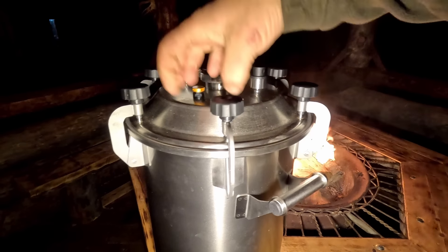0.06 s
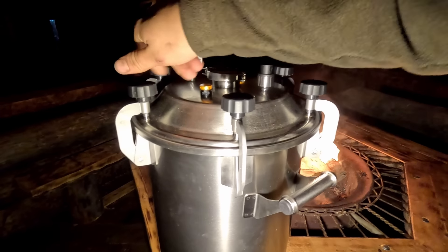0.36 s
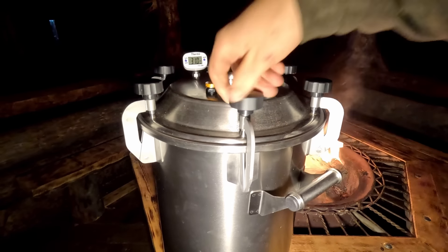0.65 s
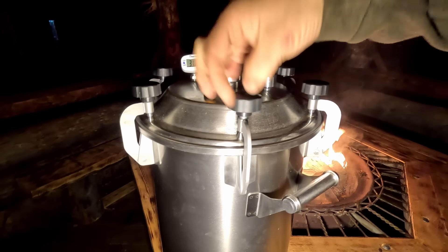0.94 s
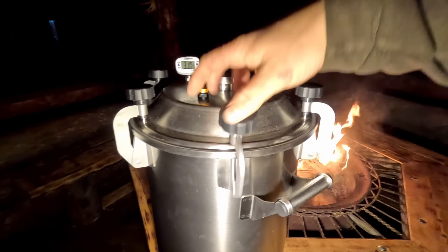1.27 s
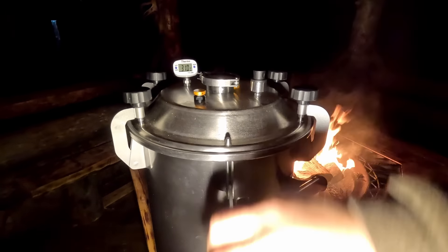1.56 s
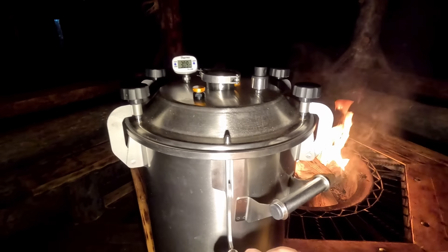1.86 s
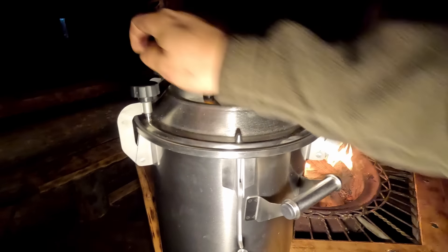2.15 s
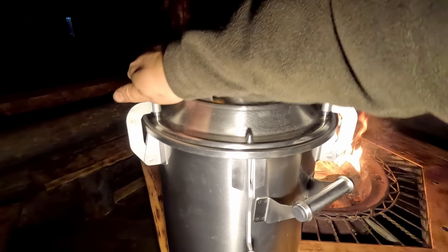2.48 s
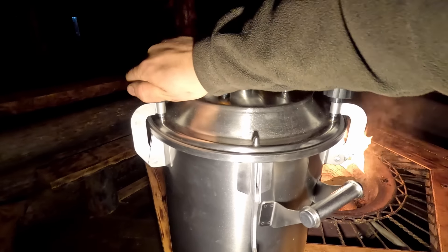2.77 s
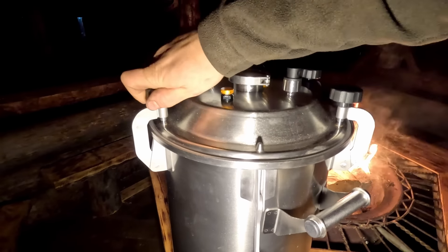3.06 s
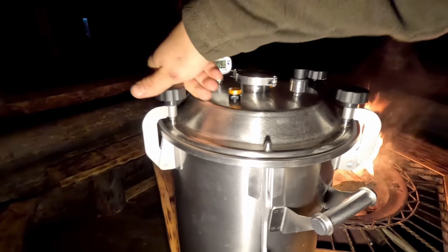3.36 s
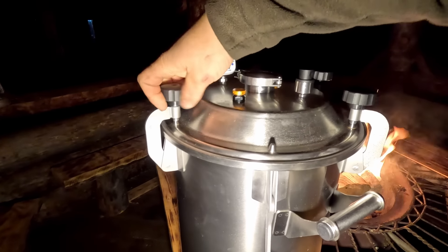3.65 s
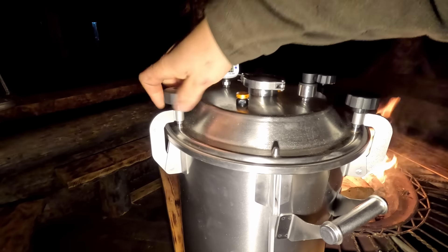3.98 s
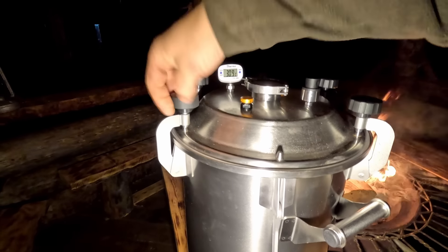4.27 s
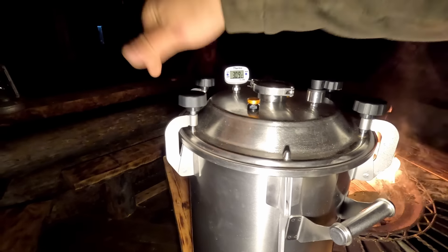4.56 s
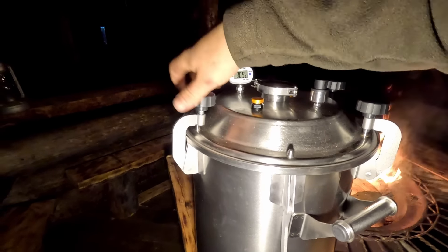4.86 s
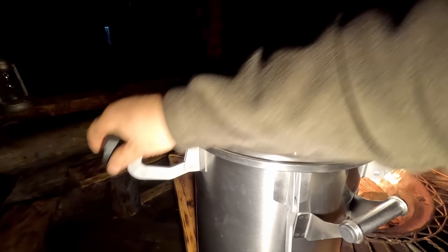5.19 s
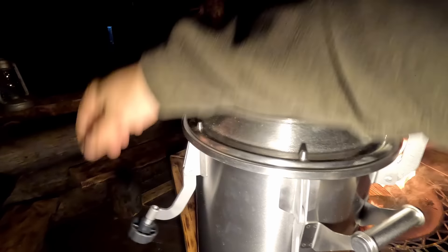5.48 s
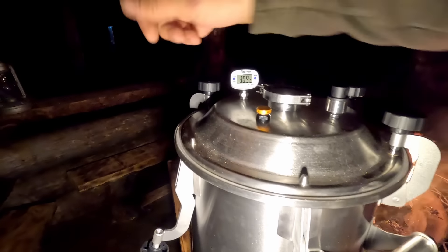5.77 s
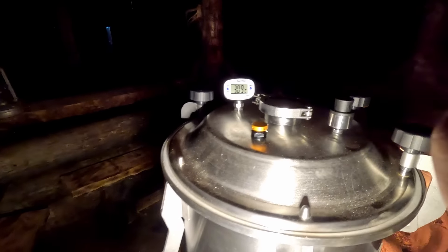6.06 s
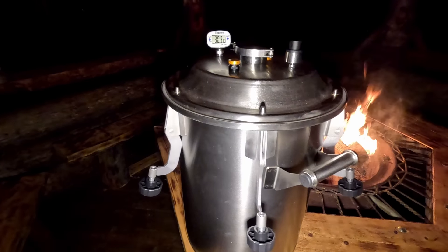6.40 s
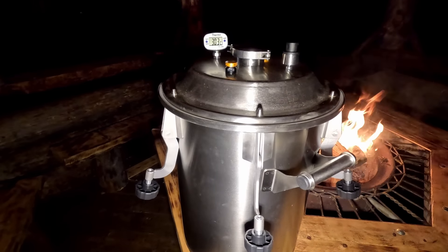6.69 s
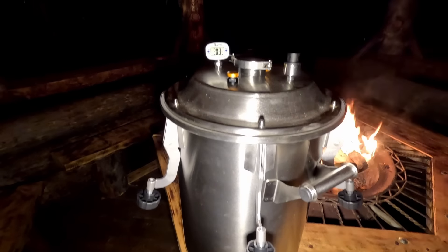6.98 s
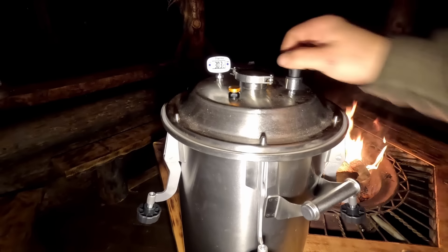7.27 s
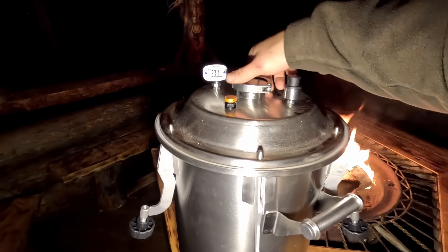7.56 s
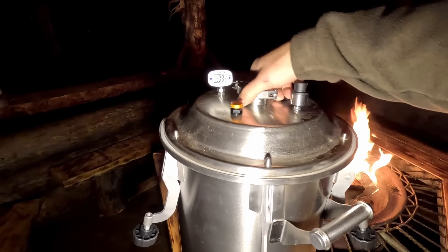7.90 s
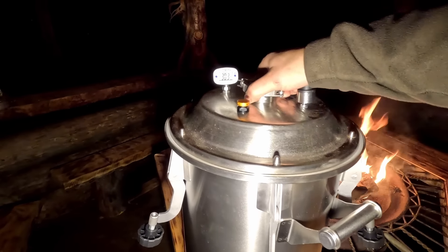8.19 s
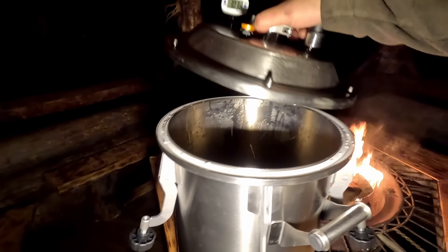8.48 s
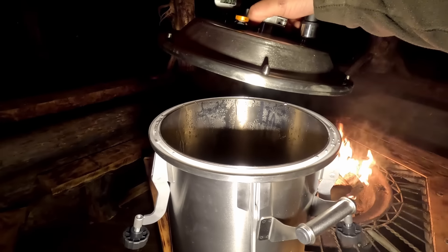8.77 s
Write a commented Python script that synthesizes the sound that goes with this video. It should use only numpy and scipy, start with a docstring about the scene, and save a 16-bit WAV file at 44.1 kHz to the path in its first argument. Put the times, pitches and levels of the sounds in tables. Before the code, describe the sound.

Metal clamps on a steel pressure pot are loosened by hand, clicking, rattling and swinging down on grinding hinges so that the pot rings. Fingers rub and a screw thread scrapes between two runs of clanks. After a lull, a tiny hiss precedes a hollow boom as the lid lifts and chatters on the rim. A wood fire flutters softly throughout, outdoors, with the microphone close.

```python
"""Under a timber shelter at night: a steel pressure canner beside a fluttering, crackling wood fire.
A hand unscrews the clamps; they rattle, swing down on grinding hinges and knock the pot into ringing.
The gasket hisses, then the lid comes free with a hollow boom and a low gust, and chatters on the rim.
Blows are decaying modes and noise, friction is trains of slips. Loud blows overload the microphone."""
import sys
import numpy as np
from scipy import signal
from scipy.fft import rfft, irfft
from scipy.io import wavfile

SR = 44100
rng = np.random.default_rng(int(sys.argv[2]) if len(sys.argv) > 2 else 0)


def transcribe(u):
    """Save the signal u as a 16-bit wav file named by the first command-line argument.

    u: samples, shape (n,) or (channels, n), limited to [-1, 1]; the rate is SR.
    q: integer samples, one column per channel.
    """
    v = np.clip(np.atleast_2d(u).T, -1, 1)
    q = np.round(v * 32767).astype(np.int16)
    wavfile.write(sys.argv[1], SR, q)


N = 394254
RING = 32768  # samples per blow
T, TIME = np.arange(RING) / SR, np.arange(N) / SR

# strongest modes of pot and front clamp: f/Hz, level/dB, t60/s
POT_MODES = [(162.7, -28, 0.78), (333, -22, 0.15), (365.6, -22.5, 1), (457.4, -24.5, 0.39),
             (622, -29.5, 0.33), (1047, -19.5, 0.25), (1150, -22, .22), (1372, -15.5, 0.15),
             (2166, -19.5, 0.18), (3130, -25, 0.13), (3430, -17.5, 0.23), (4210, -22.5, .13)]
FRONT_CLAMP_MODES = [(353, -16.5, 0.57), (521, -25, 0.55), (604, -24, 0.51), (674, -24, 0.52),
                     (755, -25, 0.51), (1507, -16.5, 0.15), (1990, -13.5, 0.098), (3130, -8, 0.079),
                     (3800, -32.5, 0.09), (4050, -20, 0.18), (5900, -21.5, 0.2), (6800, -25, 0.22)]
# spectrum of the pot's crowd of weak modes: f/Hz, level/dB
POT_SPECTRUM = [(70, -35.5), (115, -23), (155, -17.5), (255, -11), (350, -6.5), (470, -7), (820, -8),
                (1380, -1), (1720, -6), (3200, -2.5), (6000, -8.5), (8200, -20.5), (9600, -21.5),
                (15500, -58.5)]


def gain_of(db):
    """Decibels to amplitude."""
    return 10 ** (np.asarray(db) / 20)


def unit_rms(x):
    """Scales to rms 1."""
    return x / np.sqrt(np.mean(x ** 2) + 1e-20)


def value_at(points, hz):
    """Interpolates (f/Hz, value) points over log frequency."""
    f, value = np.transpose(points)
    return np.interp(np.log(hz + 1), np.log(f + 1), value)


def coloured(x, spectrum):
    """Filters x by (f/Hz, level/dB) points; rms 1."""
    hz = np.fft.rfftfreq(x.shape[-1], 1 / SR)
    return unit_rms(irfft(rfft(x) * gain_of(value_at(spectrum, hz)), x.shape[-1]))


def envelope(t_s, db):
    """Gain curve, silent outside its span."""
    return gain_of(np.interp(TIME, t_s, db, left=-120, right=-120))


def decay(t60_s):
    """Exponential decay."""
    return gain_of(-60 * T / t60_s)


def add(mix, t_s, sound):
    """Mixes a sound in at t_s."""
    part = mix[:, max(round(t_s * SR), 0):][:, :sound.shape[-1]]
    part += sound[..., :part.shape[1]]


def noise(size, spread):
    """Stereo noise: a shared part plus a smaller opposed part."""
    mid, side = rng.standard_normal((2, size))
    return np.array([mid + spread * side, mid - spread * side])


def slips(per_s, uneven_db, t60_s):
    """Random train of tiny impulses, each with a short noisy ring."""
    sizes = gain_of(uneven_db * np.minimum(rng.exponential(1, N), 4)) * rng.choice([-1, 1], N)
    train = sizes * (rng.random(N) < per_s / SR)
    ring = noise(RING, spread=0.15) * decay(t60_s)
    return signal.oaconvolve(train[None], ring, axes=1)[:, :N]


def hand_motion(moves):
    """Gain curve with one bell-shaped swell per move."""
    return sum(gain_of(db) * np.exp(-2 * ((TIME - t_s) / width_s) ** 2) for t_s, width_s, db in moves)


def fire(flutter_db=-36, roar_db=-38.5, lick_db=2, hiss_db=-48, spark_db=-9):
    """Flames flutter, roar in uneven licks and hiss; a few sparks snap."""
    # flame spectra: f/Hz, level/dB
    flutter = [(5, -6), (15, -5), (35, 2.5), (50, -7.5), (70, -8), (105, -34.5), (200, -61)]
    roar = [(70, -51), (112, -36), (138, 4), (170, -5), (210, 3.5), (255, -11), (310, -9.5), (365, -16.5),
            (440, -27.5), (540, -35), (700, -39), (1500, -64)]
    hiss = [(300, 11.5), (850, -6.5), (1200, 6), (2200, -0.5), (4400, -7), (7000, -8.5), (9800, -17),
            (12500, -33.5), (15500, -57)]
    # sparks: t/s, level/dB re spark_db
    sparks = [(0.5698, -27.5), (6.0836, -29), (6.5, -35.5), (6.998, -22.5)]
    licks = coloured(rng.standard_normal(N), [(1, -10), (6, 16.5), (14, -18), (40, -61.5), (200, -120)])
    out = coloured(noise(N, spread=0.18), flutter) * gain_of(flutter_db)
    out += coloured(noise(N, spread=0.07), roar) * gain_of(roar_db + lick_db * licks)
    out += coloured(noise(N, spread=0.59), hiss) * gain_of(hiss_db)
    for t_s, db in sparks:
        snap = coloured(noise(RING, spread=0.4), [(500, -7), (2500, 3), (8000, -2), (15000, -21.5)])
        add(out, t_s, gain_of(db + spark_db) * snap * (decay(0.017) + 0.096 * decay(0.1)))
    return out


def embers(db=-66):
    """Tiny dry crackles of burning wood."""
    crackles = slips(per_s=14, uneven_db=3.5, t60_s=0.024)
    return gain_of(db) * coloured(crackles, [(500, -9.5), (2500, 3), (8000, -3), (15000, -21)])


def strike(body, colour, modes, contact_ms, register_db, crowd_db,
           alike=0.57, crack=0.47, crack_t60_s=0.041, tail=0.45, tick_db=0):
    """Blow on steel: a tick, a crowd of weak modes dying register by register, a few clear modes."""
    # steel's thud, clang, ring and sparkle registers: f/Hz, t60/s
    registers = [(270, 0.75), (900, 0.36), (3600, 0.22), (11000, 0.17)]
    centres_hz, t60s_s = np.transpose(registers)
    hz = np.fft.rfftfreq(RING, 1 / SR)
    # each blow hits another spot: only part of the ring repeats, other resonances stand out
    crowd = alike * body + np.sqrt(1 - alike ** 2) * noise(RING, spread=0.28)
    spot_db = 3.5 * value_at(np.c_[np.geomspace(200, 16000, 70), rng.standard_normal(70)], hz)
    spectrum = rfft(coloured(crowd, colour)) * unit_rms(gain_of(spot_db))
    out = np.zeros((2, RING))
    for weights, t60_s, db in zip(np.eye(len(registers)), t60s_s, register_db):
        band = irfft(spectrum * value_at(np.c_[centres_hz, weights], hz))
        out += gain_of(db + crowd_db) * band * (crack * decay(crack_t60_s) + tail * decay(t60_s))
    for f_hz, db, t60_s in modes:
        excited_db = db + value_at(np.c_[centres_hz, register_db], f_hz) + 2 * rng.standard_normal()
        out += gain_of(excited_db) * decay(t60_s) * np.sin(2 * np.pi * (f_hz * T + rng.random()))
    out *= np.minimum(T * 1000 / contact_ms, 1)
    # shorter contact, louder tick
    tick = coloured(noise(RING, spread=0.5), [(1000, -18), (4000, 12), (10000, -11.5), (16000, -27.5)])
    return out + gain_of(tick_db) / max(contact_ms, 1) ** 2 * tick * decay(0.0032)


def rattle(bounce, rattle_ms, count=9, gap_s=0.011, db=-3):
    """A loose part bounces at uneven gaps, fading over about rattle_ms."""
    times_s = gap_s * np.cumsum(rng.uniform(0.5, 1.5, count))
    out = np.zeros((2, RING))
    for t_s, sign in zip(times_s, rng.choice([-1, 1], count)):
        fade = np.exp(-(t_s * 1000 / rattle_ms) ** 2)
        add(out, t_s, sign * gain_of(db) * fade * bounce)
    return out


def clamps(side_from_s=2.3, handle_from_s=7.2):
    """Front clamp, side clamp, then lid handle knock on the closed pot and ring with it."""
    # knocks: t/s, level/dB, contact/ms, rattle/ms, thud/dB, clang/dB, sparkle/dB
    knocks = [(0.006, -9, 0.41, 63, -2.5, 4, 2), (0.067, -2, 3.9, 12, -2.5, -3, 5.5),
              (0.301, -36.5, 5.8, 6.4, 20, 8, -22), (0.645, -1.5, 5.5, 12.4, -4.5, -1.5, 3.5),
              (0.709, -15.5, 3.9, 9.1, 8.5, 9.5, 2), (0.744, -3, 8.2, 26, -10.5, -3.5, 6.5),
              (0.765, -3.5, 4.3, 19, -6.5, -1, 7), (0.925, -6, 1.3, 83, -5, -1, -0.5),
              (0.9701, -7, .6, 16, -8, 1, 4.5), (1.013, -15.5, 2, 8, 1.5, -4.5, -7),
              (1.107, -15, 1.4, 15, 4, 5.5, -8), (1.173, -10.5, 2.1, 8, -11.5, -5.5, -5),
              (1.187, -9.5, 4.4, 19, -1, 6.5, 5.5), (1.22, -9, 1.1, 20, 7, 4, -4),
              (1.308, -13, 7.8, 45, 3.5, 5.5, -13), (1.599, -20, 2.5, 11, -2.5, 16.5, -9.5),
              (1.650, -3.5, 1.4, 8.2, -5.5, -1.5, -4), (1.817, -2.5, 0.63, 3.6, -10.5, -2.5, 8.5),
              (1.995, -14.5, 10, 20, 5, 5, -32), (2.065, -5, 1.3, 5.7, -1, 1.5, 5),
              (2.572, -34, .8, 7.1, 15, 2, -8), (3.279, -41, 1.5, 12, 24, 16, 5),
              (3.424, -35.5, 9.1, 13, 15.5, 9.5, 15.5), (3.622, -33, 3.5, 7.1, 13.5, -1, -5),
              (3.712, -30.5, 6.2, 22, 14.5, 4, 5), (4.047, -8, 2.8, 8, 4.5, -2, -8.5),
              (4.103, -27, 0.6, 5.6, 15, 8, 2.5), (4.161, -10, .7, 6.1, 2, 0, -12),
              (4.256, -8.5, 1, 7.3, 7.5, 3.5, -20), (4.265, -5.5, 0.5, 11, -5, -20.5, 3),
              (4.303, -11.5, 1.7, 24, 12.5, -2, -1), (4.334, -4.5, 1.4, 35, -16, -1.5, 8),
              (4.467, -7, 1.1, 8.7, 12, 4.5, -1), (4.484, -2, 2.5, 68, -3, -4, -1.5),
              (4.584, -11, 2, 8, -17.5, -8, -2), (4.675, -2.5, 6, 7.1, -9.5, -10.5, -8),
              (4.717, -5.5, 1.4, 18, 0.5, 2, 1.5), (4.872, -35, 3.4, 9, -2, 7, -11.5),
              (4.960, -6.5, 3, 5.9, -9, -5, -3), (4.969, -5.5, 1.3, 10, -11.5, 2, 4),
              (5.099, -14.5, 3.5, 35, 0, 5, -4), (5.336, -15, 0.46, 4.1, -8.5, 6, -15.5),
              (5.386, -12, 3.1, 10, -13.5, 0.5, -2.5), (5.423, -2.5, 5.5, 8.3, -13, -1.5, 5),
              (5.486, 4, 0.47, 4.5, -5, -6.5, 2.5), (5.709, -1.5, .9, 13, -14.5, -7.5, 4),
              (5.780, -8, 2.4, 4.2, 0, -11, -0.5), (6.856, -21.5, 4.4, 15, -15, -10, 8),
              (7.508, -31, 1.8, 5, -4.5, 4, -15), (7.550, -32, 5, 8.9, 0.5, -4, 5),
              (7.701, -50, 3, 8.7, -3, -16, 30), (7.742, -39, 3, 8, -18, -8, 9)]
    # modes: f/Hz, level/dB, t60/s
    side_modes = [(258, -11.5, 0.14), (369, -26, 1.1), (1433, -19.5, 0.26), (1520, -12.5, 0.099),
                  (2840, -17, 0.09), (3320, -18.5, 0.15), (4155, -24, 0.23), (4450, -23.5, 0.22),
                  (5700, -21.5, .12), (5950, -26, 0.16), (6180, -45, 0.7), (9140, -35.5, 0.25)]
    handle_modes = [(355, 7.5, 0.43), (1107, -6, 0.23), (1197, -7, 0.19), (1735, -12, 0.13),
                    (3540, -8.5, 0.21), (5120, -18, 0.32)]
    out, body = np.zeros((2, N)), noise(RING, spread=0.26)
    for t_s, db, contact_ms, rattle_ms, thud_db, clang_db, sparkle_db in knocks:
        if t_s < side_from_s:
            modes, crowd_db = FRONT_CLAMP_MODES, 0
        elif t_s < handle_from_s:
            modes, crowd_db = side_modes, 0
        else:
            modes, crowd_db = handle_modes, -6
        register_db = [thud_db, clang_db, 0, sparkle_db]
        blow = strike(body, POT_SPECTRUM, POT_MODES + modes, contact_ms, register_db, crowd_db)
        # bounces glance off: little ring
        bounce = strike(body, POT_SPECTRUM, [], contact_ms, register_db, crowd_db,
                        alike=0.61, crack=0.43, crack_t60_s=0.064, tail=0.34, tick_db=-15.5)
        add(out, t_s, gain_of(db) * (blow + rattle(bounce, rattle_ms)))
    return out


def fingers():
    """Skin and sleeve rub on knobs and lid."""
    # strokes: centre t/s, width/s, level/dB
    strokes = [(0.64, .012, -38), (0.926, .02, -30.5), (2.33, 0.035, -44.5), (2.463, 0.08, -38.5),
               (3.227, 0.16, -40.5), (3.69, 0.21, -40), (3.883, 0.091, -40.5), (4.039, .07, -34),
               (4.257, .02, -23.5), (4.455, .03, -21.5), (6.184, 0.032, -48.5), (8.15, 0.057, -45.5),
               (8.289, 0.074, -34)]
    # rubbing skin: f/Hz, level/dB
    skin = [(200, 10), (900, -5), (1300, 0), (2100, 3), (4300, -4), (5500, -4.5), (8000, -10), (11000, -22),
            (15500, -41)]
    return coloured(slips(per_s=1600, uneven_db=5.5, t60_s=0.15), skin) * hand_motion(strokes)


def hinges(held_t60_ratio=0.43):
    """A dry hinge grinds; its slips set low, hand-damped modes of pot and clamp groaning."""
    # one list per clamp swing: t/s, grind level/dB, groan level/dB
    swings = [
        [(1.45, -41, -36.5), (1.576, -26.5, -28.5), (1.636, -28, -21), (1.696, -32, -20), (1.746, -19, -23),
         (1.804, -25, -22.5), (1.956, -38.5, -24), (2.02, -24, -38)],
        [(5.02, -28.5, -37), (5.124, -29, -38), (5.18, -32, -29), (5.48, -28, -26.5)],
    ]
    friction = slips(per_s=900, uneven_db=4, t60_s=0.093)
    through_pot = coloured(friction, POT_SPECTRUM)
    grind = coloured(through_pot, [(300, -17), (700, 6), (1400, -2.5), (6000, -10), (14000, -20.5)])
    ring = sum(gain_of(db) * decay(t60_s * held_t60_ratio) * np.sin(2 * np.pi * (hz * T + rng.random()))
               for hz, db, t60_s in POT_MODES + FRONT_CLAMP_MODES if 300 < hz < 900)
    groan = unit_rms(signal.oaconvolve(friction, ring[None], axes=1)[:, :N])
    out = np.zeros((2, N))
    for swing in swings:
        t_s, grind_db, groan_db = np.transpose(swing)
        out += grind * envelope(t_s, grind_db) + groan * envelope(t_s, groan_db)
    return out


def screws():
    """Each turn of a knob scrapes its thread in a run of slips."""
    # turns: centre t/s, width/s, level/dB
    turns = [(3.227, 0.033, -28), (3.71, .05, -37), (3.788, 0.017, -32), (3.845, .025, -39.5),
             (3.882, 0.025, -36)]
    # thread resonances: f/Hz, level/dB
    thread = [(300, -6.5), (1200, -9), (1600, -13), (2200, 7.5), (3000, -7.5), (4100, 1), (5200, -10.5),
              (6800, -2.5), (9500, -14.5), (15000, -42)]
    return coloured(slips(per_s=610, uneven_db=4.5, t60_s=0.044), thread) * hand_motion(turns)


def handling():
    """The carried microphone takes soft bumps: swells of low noise."""
    # bumps: t/s, level/dB, f/Hz, length/s
    bumps = [(5.643, -25.5, 67, .06), (6.802, -24.5, 130, 0.042), (6.947, -23, 87, 0.16)]
    out = np.zeros((2, N))
    for t_s, db, hz, length_s in bumps:
        swell = signal.windows.hann(int(length_s * SR))
        low = coloured(noise(RING, spread=0.1), [(hz / 4, -25), (hz, 0), (hz * 2, -16), (hz * 8, -60)])
        add(out, t_s, gain_of(db) * low[:, :len(swell)] * swell)
    return out


def gasket():
    """Thin hiss as the gasket parts from the rim."""
    # hiss spectrum: f/Hz, level/dB
    hiss = [(8000, -32.5), (11000, -12.5), (11800, -5), (12900, -13.5), (14000, -33)]
    # hiss envelope: t/s, level/dB
    release = [(8.225, -69), (8.245, -36), (8.272, -51.5), (8.32, -66)]
    return coloured(noise(N, spread=0.5), hiss) * envelope(*np.transpose(release))


def lid(thud_db=-3):
    """The freed lid rocks on the rim; the knocks peak early, then weaken."""
    # knocks: t/s, level/dB, contact/ms, clang/dB, sparkle/dB
    knocks = [(8.323, -24, 5.1, 10, -2), (8.362, -10.5, 8, 6, -3), (8.374, -0.5, 5, -8, 0),
              (8.418, -3.5, 3.5, -5.5, -3), (8.463, -9.5, 2, -4, -1), (8.499, -17, 2.8, -4, -1),
              (8.541, -15, 2.1, 2.5, -4), (8.576, -33, 6, 9, 6), (8.636, -30, 3.3, 10, 5),
              (8.682, -18, 2.2, -1.5, -4), (8.817, -41.5, 3, 7.5, 13), (8.922, -32, 5, -8, -3)]
    # strongest lid modes: f/Hz, level/dB, t60/s
    modes = [(693, -19, 0.28), (933, -15.5, 0.15), (1076, -17, 0.24), (1130, -14.5, 0.13),
             (1332, -21, 0.27), (2015, -18.5, 0.22), (2220, -31, 0.26), (2590, -15, 0.14),
             (3090, -20, 0.18), (3380, -13, 0.075), (4450, -34, 0.17), (5200, -38, .28)]
    # crowd of weak lid modes: f/Hz, level/dB
    spectrum = [(100, -27.5), (300, -6), (600, -15), (1070, -5.5), (1750, -10), (2300, -3.5), (3450, -10),
                (5700, -10.5), (6600, -18.5), (9000, -25.5), (15500, -61)]
    out, body = np.zeros((2, N)), noise(RING, spread=0.34)
    for t_s, db, contact_ms, clang_db, sparkle_db in knocks:
        blow = strike(body, spectrum, modes, contact_ms, [thud_db, clang_db, 0, sparkle_db],
                      crowd_db=-3, alike=0.76, tail=0.42, tick_db=-16)
        add(out, t_s, gain_of(db) * blow)
    return out


def booms():
    """A dropping clamp or the freed lid pushes on the pot's hollow; its low modes ring and beat."""
    # pushes: t/s, level/dB, rise/ms
    pushes = [(1.82, -20.5, 1.7), (5.488, -15.5, 2.8), (8.307, -18, 2.7), (8.361, -1, 16),
              (8.417, -14.5, 10.3), (8.628, -21, 9.8)]
    # cavity modes: f/Hz, level/dB, t60/s
    modes = [(139, -41, 0.26), (167.7, -4, 0.47), (194.4, -4, 0.48), (240, -12, 0.19)]
    out = np.zeros((2, N))
    for t_s, db, rise_ms in pushes:
        rise_s = rise_ms / 1000
        ring = sum(gain_of(mode_db) * decay(t60_s) * np.cos(2 * np.pi * hz * (T - rise_s))
                   for hz, mode_db, t60_s in modes)
        add(out, t_s, gain_of(db) * ring * np.minimum(T / rise_s, 1) ** 2)
    return out


def gust(start_s=8.335, rise_s=0.024, t60_s=0.85, db=-14):
    """Lifting the lid draws in a low gust of air."""
    # inrushing air: f/Hz, level/dB
    air = [(10, -10.5), (30, -8), (48, 11.5), (75, -2), (110, -14.5), (160, -10), (220, -8), (400, -25.5),
           (1500, -53)]
    age_s = np.maximum(TIME - start_s, 0)
    swell = np.minimum(age_s / rise_s, 1) * gain_of(db - 60 * age_s / t60_s)
    return coloured(noise(N, spread=0.15), air) * swell


def scene():
    """Canner and fire in stereo; the left channel is slightly later and quieter."""
    # left microphone's lag: f/Hz, phase/rad
    lag = [(300, 0.037), (1000, .08), (3000, 0.49), (5250, 0.39), (9000, 0.12), (15000, 0.57)]
    canner = clamps() + lid() + gasket() + booms() + gust() + hinges() + fingers() + screws()
    left, right = canner + handling() + fire() + embers()
    lag_rad = value_at(lag, np.fft.rfftfreq(N, 1 / SR))
    left = irfft(rfft(left) * np.exp(-1j * lag_rad), N)
    return np.array([left * gain_of(-0.86), right * gain_of(0.1)])


def record(dry, knee=0.65, cutoff_hz=15700):
    """Overload rounds the peaks; the sound drops out once, briefly; the top is cut."""
    linear = np.clip(dry, -knee, knee)
    rounded = linear + (1 - knee) * np.tanh((dry - linear) / (1 - knee))
    dropout = np.interp(TIME, [6.264, 6.266, 6.372, 6.39, 6.425], [1, 0, 0, 0.2, 1])
    low_pass = signal.firwin(511, cutoff_hz, window=("kaiser", 8), fs=SR)
    return signal.oaconvolve(rounded * dropout, low_pass[None], "same", axes=1)


dry = scene()
out = record(dry)
transcribe(out)
```